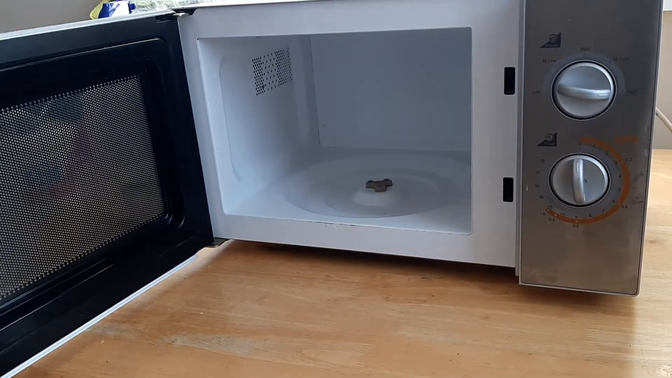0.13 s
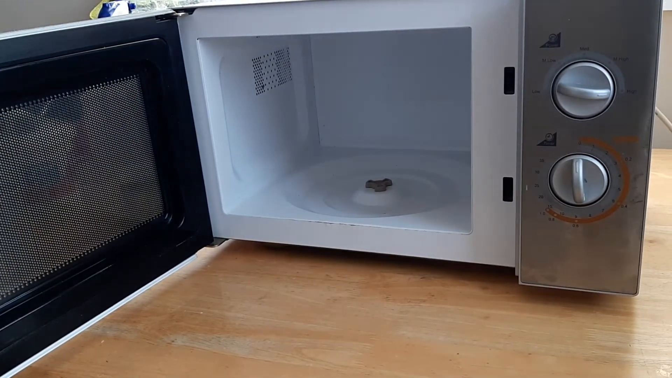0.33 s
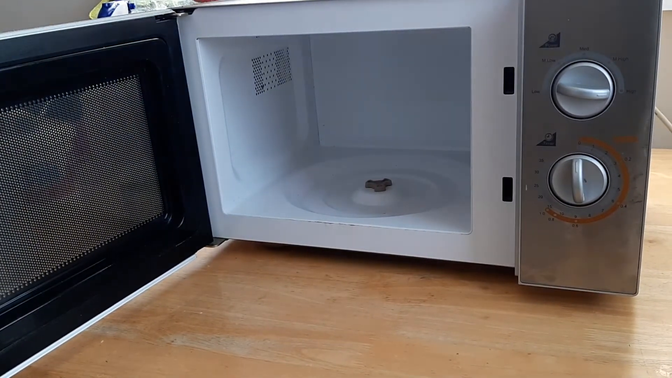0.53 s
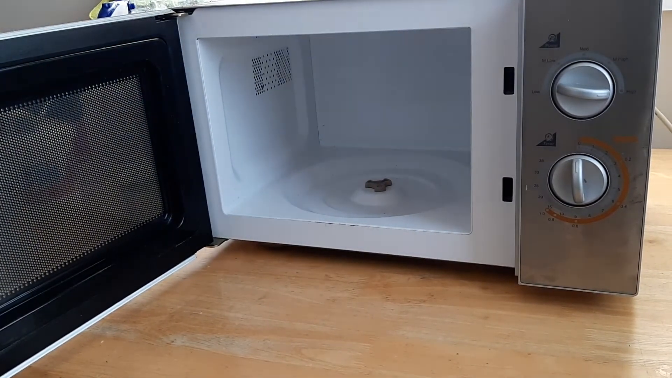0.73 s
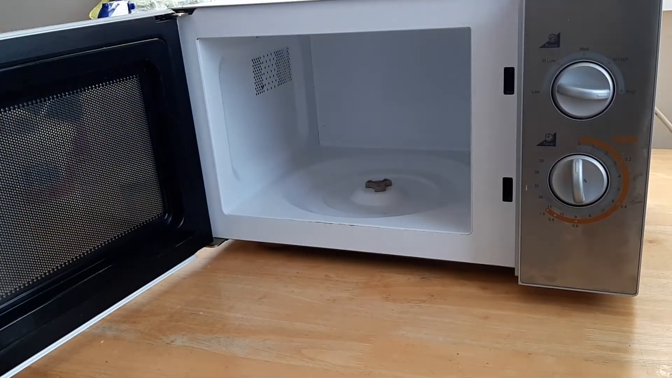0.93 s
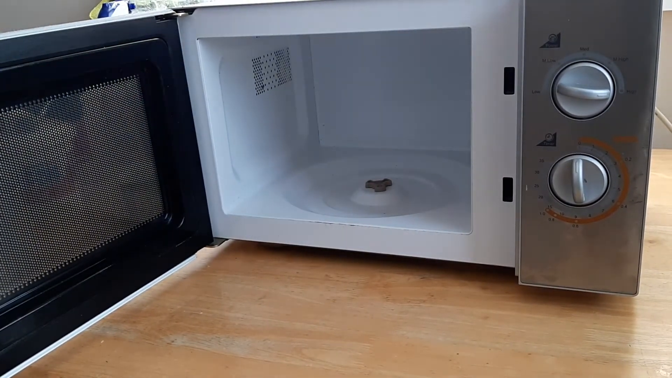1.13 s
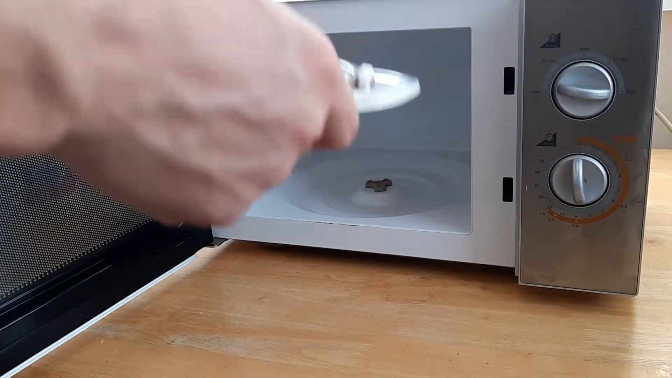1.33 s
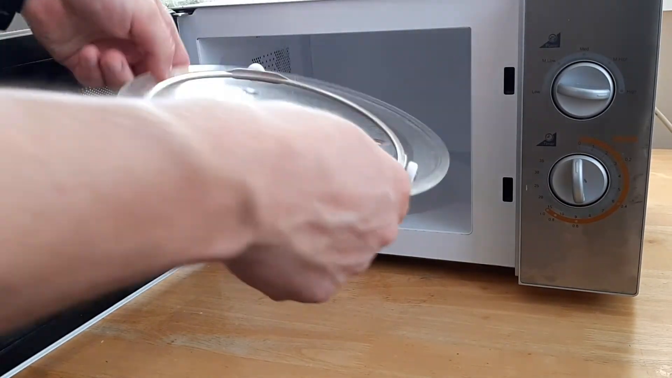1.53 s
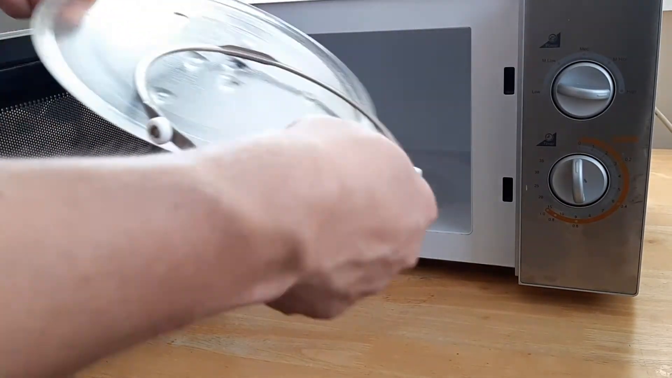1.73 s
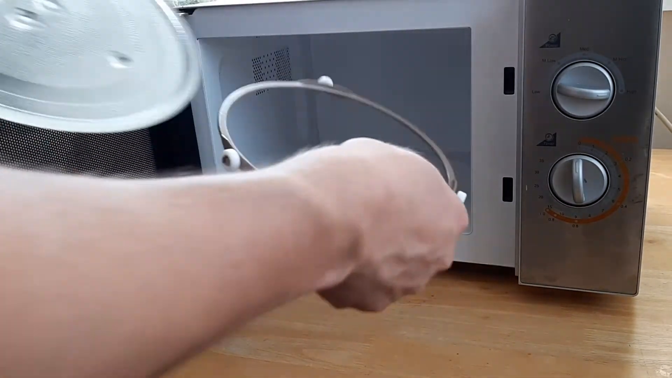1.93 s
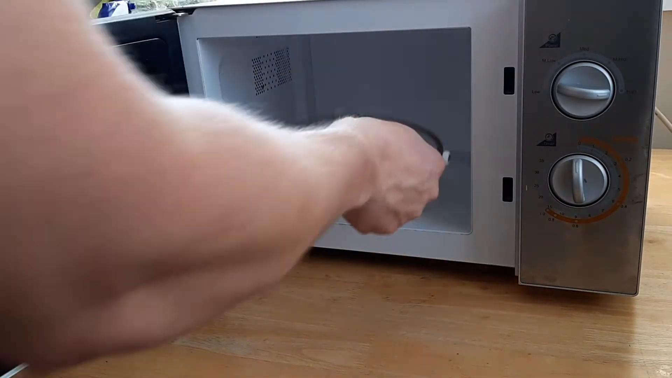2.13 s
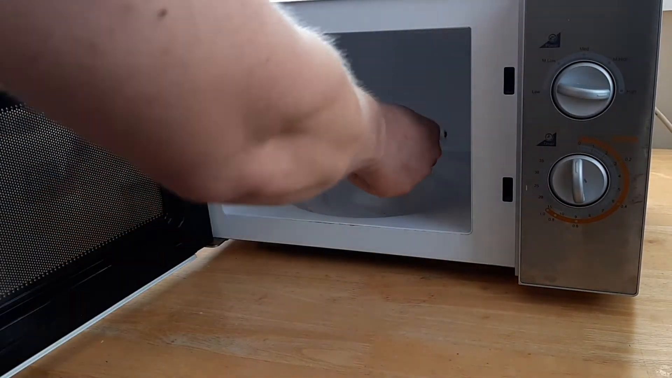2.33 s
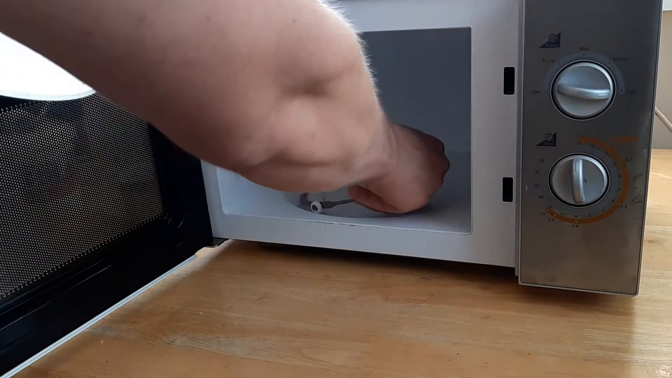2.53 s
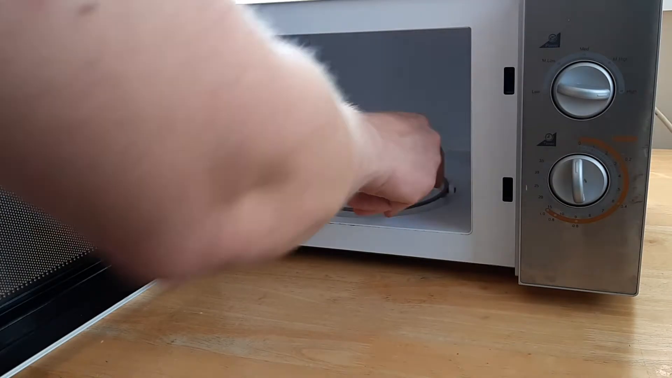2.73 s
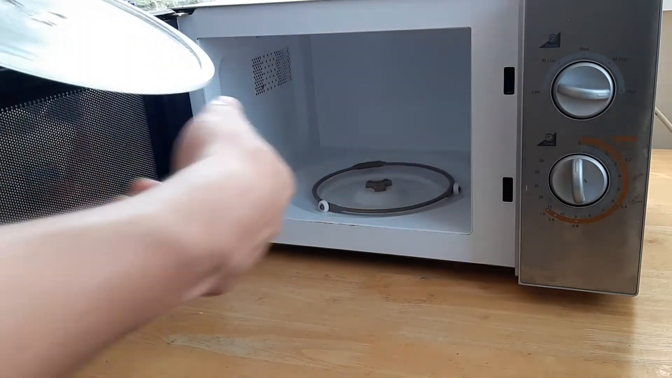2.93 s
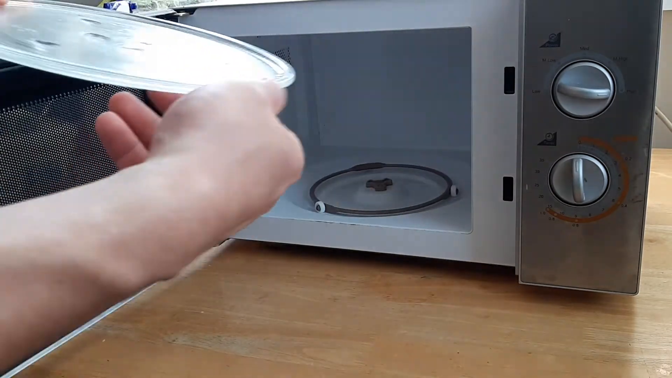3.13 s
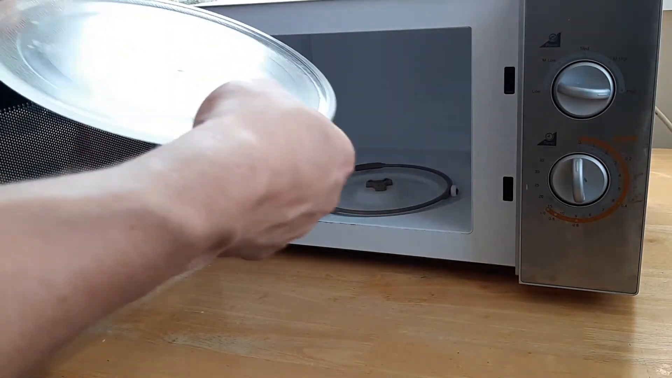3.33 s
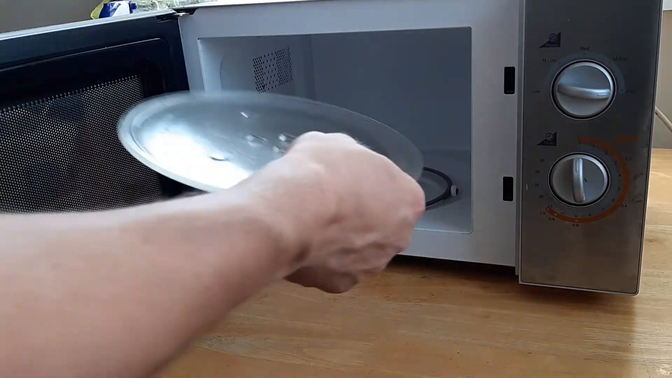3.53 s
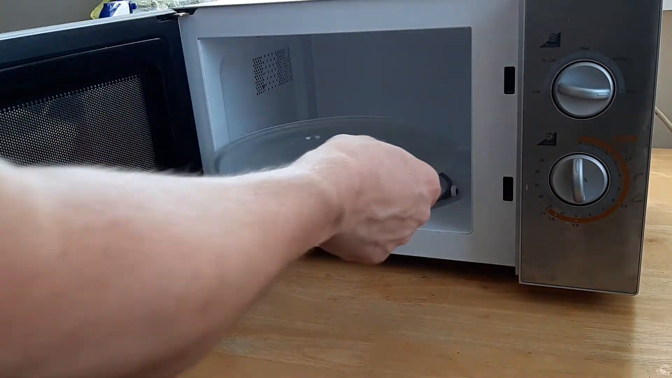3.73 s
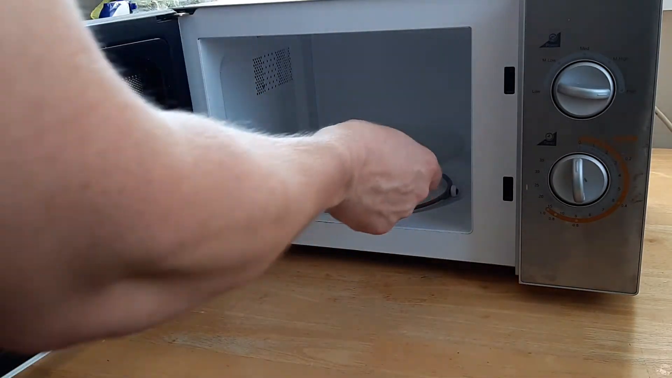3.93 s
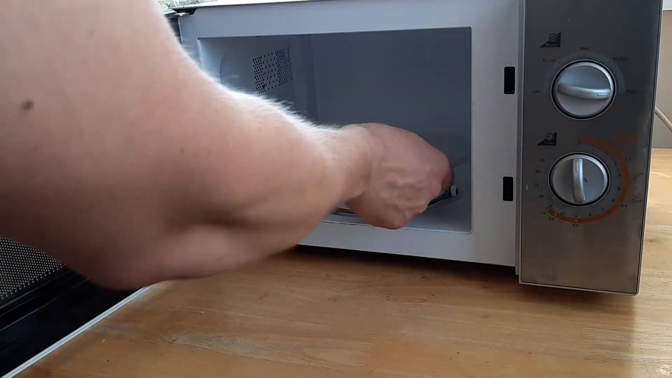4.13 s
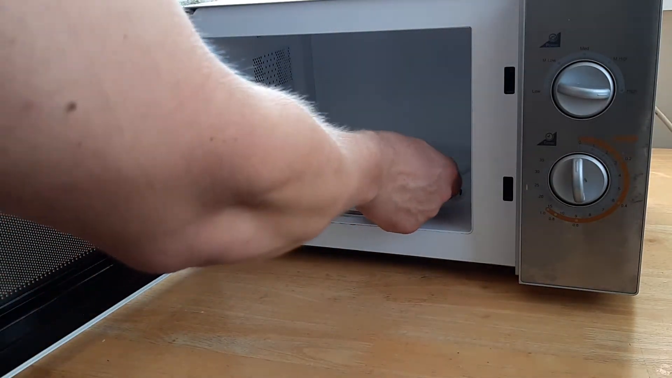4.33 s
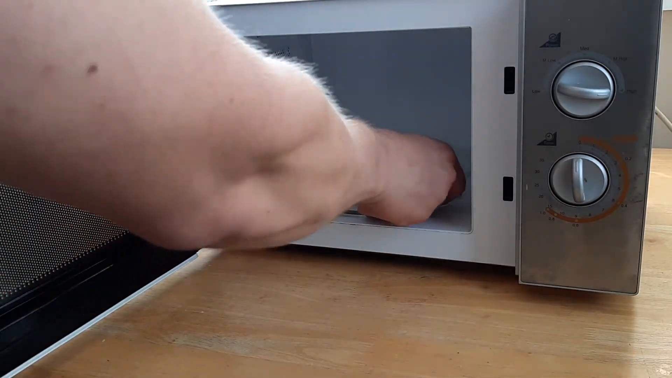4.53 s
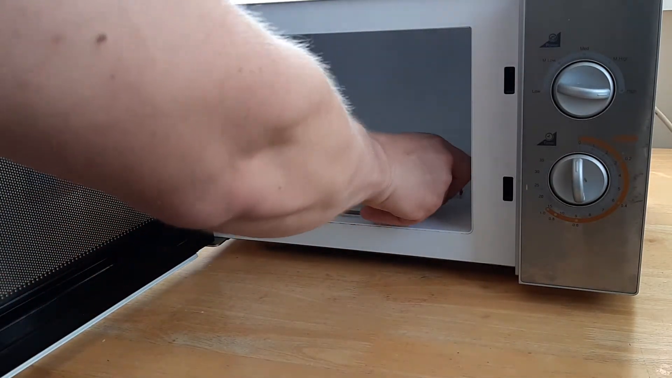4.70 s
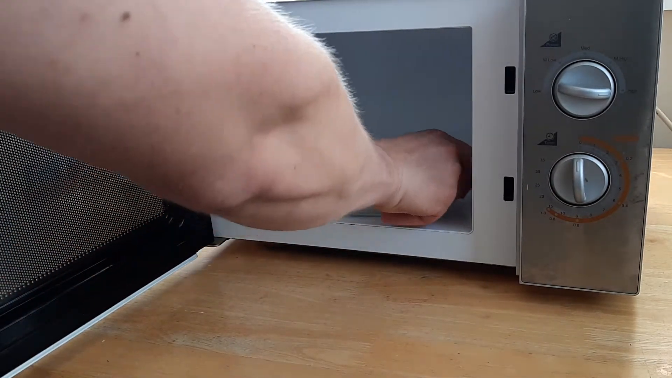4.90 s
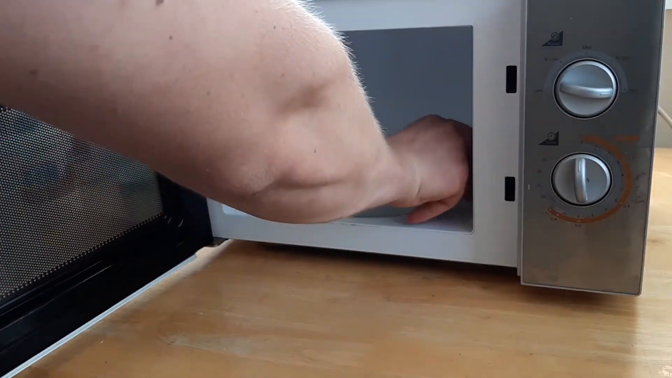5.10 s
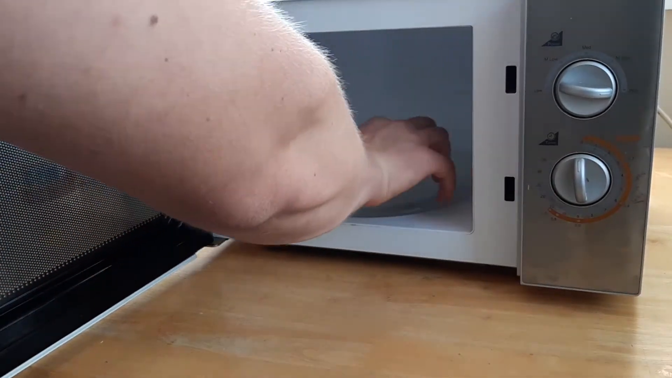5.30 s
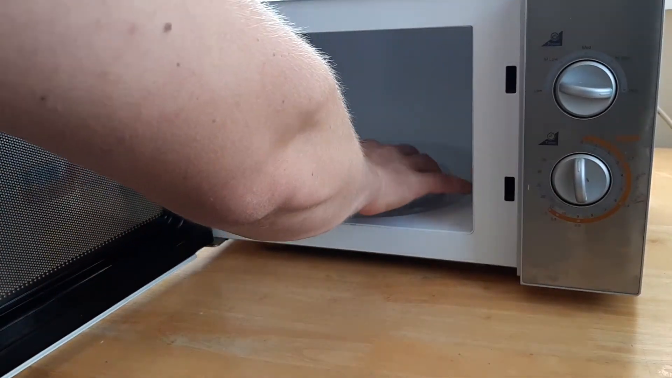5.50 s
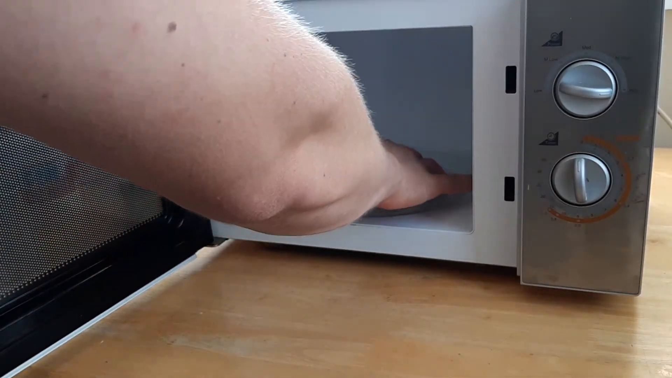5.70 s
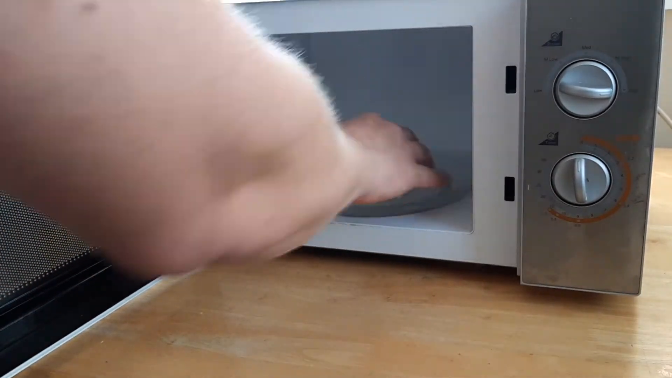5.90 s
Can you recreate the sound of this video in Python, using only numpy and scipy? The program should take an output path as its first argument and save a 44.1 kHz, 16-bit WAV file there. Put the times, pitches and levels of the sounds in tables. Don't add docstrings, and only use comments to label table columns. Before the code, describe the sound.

A glass microwave plate and roller ring clink in the hands, then are set with hard knocks onto the metal oven floor, close up.

```python
import sys
import numpy as np
from scipy import signal
from scipy.fft import rfft, irfft, next_fast_len
from scipy.io import wavfile

SR = 44100
rng = np.random.default_rng(int(sys.argv[2]) if len(sys.argv) > 2 else 0)


def invert_db(level):
    return 10 ** (np.asarray(level, dtype=float) / 20)


def persist_wave(psi):
    counts = np.round(np.clip(psi, -1, 1) * 32767).astype(np.int16)
    wavfile.write(sys.argv[1], SR, np.atleast_2d(counts).T)


N = 267113

# t/s, effort as rumble level/dB
ARM_EFFORT = [(0, -45.5), (.55, -41), (1.05, -48), (1.7, -51), (2.05, -46), (2.4, -46.5), (3.05, -53.5),
              (3.7, -55), (4.0, -49.5), (4.2, -46), (4.5, -43), (5.1, -43), (5.55, -46), (6.06, -49.5)]
# f/Hz, density/dB per Hz
RUMBLE = [(30, -24.5), (60, -15.5), (90, -21.5), (130, -9), (200, -3.5), (300, -0.5), (430, -8), (600, -3),
          (800, -12.5), (1050, -11.5), (1300, -27.5), (2500, -29), (4000, -49.5), (6000, -90.5)]
# f/Hz, density/dB per Hz
RUSTLE = [(700, -5.5), (1200, 1.5), (1600, -10), (2500, -10), (3500, -6), (5000, -16.5), (6200, -10.5),
          (7400, -9.5), (8600, -33.5), (11000, -28), (16000, -31)]
# f/Hz, rms level/dB
HUM = [(200, -70.5), (335, -74.5), (435, -73), (585, -69), (1000, -71)]
# f/Hz, likeness [0..1]
LIKENESS = [(60, 0.99), (250, 0.97), (500, 0.69), (1000, 0.64), (2000, 0.075), (8000, 0.075)]
# f/Hz, t60/s
KITCHEN = [(100, 0.56), (300, 0.49), (1000, 0.47), (3000, 0.44), (6000, 0.37), (12000, 0.3)]
# f/Hz, level/dB
MICROPHONE = [(30, -17), (60, -12), (120, -3.5), (5200, 2.5), (6400, -8.5), (7400, -17), (8600, -8.5),
              (14500, -8), (15600, -10), (16200, -31)]
STILL_DB, RUSTLE_AT_REST_DB, RUSTLE_FOLLOWS = -55, -69, 0.99
DEEP_AT_REST_DB, DEEP_FOLLOWS = -3.5, .9

# f/Hz, level/dB, t60/s
OVEN_MODES = [(142.3, -27, .2), (153, -18, 0.11), (214.2, 1, 0.18), (238.5, -9, 0.33), (284, -11.5, 0.15),
              (324.6, -1.5, 0.16), (390, -11.5, 0.067), (450, -3, 0.1), (510, -6.5, 0.035),
              (554.6, -11.5, 0.22), (702, -9, 0.3), (926.5, -3, 0.51)]
# f/Hz, level/dB, t60/s
RING_MODES = [(1210, -9, .05), (1400, -8, .07), (2020, -7, .08), (2234, -6, .09), (3000, -3, .06),
              (3327, -1, .07), (3542, -1, .06), (3994, -10, .04), (4970, -6, .05), (5954, -6, .04)]
PLATE_HZ = [720, 1567, 1642, 2288, 2751, 2897, 3520, 3790, 4090, 4495, 4532, 4960, 5270, 5682, 6500]
# level/dB, t60/s
PLATE_RINGING = [(-10, 0.055), (1, 0.13), (-12, 0.15), (-13, 0.27), (2, 0.089), (1, 0.19), (-5, 0.14),
                 (-15, 0.31), (-0.5, 0.074), (-7.5, .2), (-4, 0.25), (-5.5, 0.22), (-26, .15), (-6, 0.082),
                 (3, 0.17)]
# f/Hz, level/dB, t60/s
PLATE_TOP = [(9050, 6.5, 0.46), (8500, -17.5, 0.7), (8800, -19, 0.25), (9600, -0.5, 0.26),
             (10950, 8.5, 0.41), (11930, 4, 0.38), (12220, -29.5, 0.46), (12900, -12, 0.57),
             (12990, -21.5, 0.22), (13900, -28, 0.28), (14170, -27, 0.55), (14930, 0, 0.19),
             (15500, -10, 0.14), (15000, -1.5, 0.1)]
# t/s, f/Hz, level/dB, t60/s
SINGING = [(.565, 398.4, -17, 0.23), (.565, 5230, -27, .1), (.74, 1567, -22, 0.43),
           (5.62, 445, -12.5, 0.27), (3.075, 1567, -50, 0.27), (1.733, 736, -26.5, 0.1),
           (1.797, 1567, -23.5, 0.42), (1.797, 2897, -28.5, 0.48), (2.407, 3370, -10.5, 0.14),
           (2.41, 3558, -9, 0.11), (2.41, 992, -18.5, 0.19), (2.411, 1400, -17.5, 0.22),
           (2.507, 557.7, -19.5, 0.21), (2.71, 3030, -11, 0.13), (2.71, 2234, -34, 0.2),
           (2.768, 2024, -28.5, 0.28), (4.255, 277, -16.5, 0.48), (4.255, 1196, -23.5, .2),
           (4.252, 5430, -36, .2), (4.252, 3055, -26, 0.17), (5.127, 2300, -29, 0.83),
           (5.127, 5440, -40, .25), (5.127, 1782, -22, .25), (5.127, 4100, -13, 0.087),
           (5.13, 990, -16.5, 0.3), (5.14, 210, -7, 0.33), (5.62, 317, -17, 0.23), (5.62, 532, -15, .3)]
# t/s, f/Hz, level/dB, stopped at t/s
STOPPED = [
    (1.733, 4531, -18, 1.796),
    (5.127, 4988, -21, 5.24),
    (2.507, 3330, -12, 2.533),
    (.725, 4092, -11.5, 0.734),
]
FREE_T60_S, STOPPED_T60_S = 0.58, .12

# low f/Hz, high f/Hz
KNOCK_EDGES_HZ = [(2200, 7500), (125, 800), (600, 2800), (7000, 17000)]
# t/s, strength/dB, weight (boom over tick)/dB, contact length/s
HAND_KNOCKS = [
    (.563, -9, 2.5, 0.004),
    (.6665, -4, -7.5, 0.0054),
    (.683, -19.5, -8, 0.0039),
    (.70, -16, -6.5, 0.011),
    (.73, -15.5, -23.5, 0.025),
    (.82, -22, -27.5, 0.02),
]
# t/s, strength/dB, weight/dB, contact length/s
RING_TAPS = [
    (1.5625, -17, -11, 0.0031),
    (1.733, -26.5, -26, .004),
    (1.796, -16.5, -40, 0.0026),
    (1.826, -28.5, -26, 0.018),
]
# t/s, strength/dB, weight/dB, contact length/s
RING_KNOCKS = [
    (2.406, -4.5, -13, 0.008),
    (2.42, -6, -19.5, 0.0033),
    (2.44, -24.5, 5, 0.0047),
    (2.507, -7, -13.5, 0.0053),
    (2.525, -32.5, -19.5, .0024),
    (2.585, -26, -3, 0.024),
    (2.709, -2.5, -6.5, 0.005),
    (2.768, -12.5, -24.5, 0.004),
    (2.79, -42.5, 16.5, 0.026),
]
# t/s, strength/dB, weight/dB, contact length/s
PLATE_KNOCKS = [
    (4.250, -8, 3.7, 0.003),
    (4.28, -40, 8, .0063),
    (4.335, -42, 8, 0.03),
    (4.585, -47, 10.5, 0.017),
    (4.675, -52, 24.8, 0.0056),
    (4.763, -38, 12, 0.0038),
    (4.840, -41.5, 12.5, 0.0084),
]
# t/s, strength/dB, weight/dB, contact length/s
SEATING_KNOCKS = [
    (5.1255, -6, 1.5, 0.0068),
    (5.140, -26, 20, 0.0023),
    (5.156, -38.5, 28, 0.0023),
    (5.208, -34, 26.5, 0.005),
    (5.245, -44.5, 16, 0.015),
    (5.357, -57.5, 31, 0.0076),
]
# t/s, strength/dB, weight/dB, contact length/s
PRESSING_KNOCKS = [
    (5.594, -25.5, 11, .014),
    (5.607, -11, 10, .005),
    (5.619, -4, -1.5, 0.0094),
    (5.640, -13.5, -1.5, 0.017),
    (5.657, -37, 27.5, .024),
    (5.678, -13.5, -15.5, 0.012),
    (5.705, -52, 12, .015),
]
CLACK_FOLLOWS_WEIGHT, AIR_FOLLOWS_STRENGTH = 0.7, 0.97
# t/s, strength/dB, dullness/dB per octave, f/Hz of the mode favoured by the spot, its level/dB
CLINKS = [(.517, -40, 7, 2800, -49.5), (0.6664, -6.5, 10, 3510, -16.5), (0.681, -29.5, -2, 2740, -16.5),
          (0.693, -34, -1, 4520, -16), (.705, -15, 14, 5680, -2), (.725, -28, -6.5, 2850, -16),
          (0.769, -46, 4, 4730, -22.5), (.820, -24, 3, 5680, -19.5), (1.382, -38, 9.5, 4000, -36),
          (1.563, -34.5, 3, 4050, -18.5), (1.732, -19, 9.5, 4520, -27.5), (1.796, -24, 5.5, 5680, -12.5),
          (1.826, -21.5, 7.5, 4070, -21), (3.091, -52, 9, 4090, -52)]
LOWEST_RING_HZ, TOP_RING_HZ = 1570, 5680
SPOT_DB_PER_OCTAVE = 86.5


def at_hz(points, hz):
    table_hz, values = np.array(points).T
    return np.interp(np.log(hz), np.log(table_hz), values)


def band(x, low_hz, high_hz):
    return signal.sosfilt(signal.butter(2, [low_hz, high_hz], "band", fs=SR, output="sos"), x)


def drift(rate_hz):
    knots = rng.standard_normal(400)
    position = np.arange(N) / SR * np.clip(rate_hz, .1, 60)
    return np.interp(position, np.arange(400), knots) * 1.2


def ring(force, hz, t60):
    radius = invert_db(-60 / (t60 * SR))
    angle = 2 * np.pi * hz / SR
    return signal.lfilter([0, np.sin(angle)], [1, -2 * radius * np.cos(angle), radius ** 2], force + 1e-18)


def stereo_bands(length, gain):
    out = 0
    edges = 30 * 2 ** np.arange(0, 9.3, .4)
    white = rng.standard_normal((2, 2, length))
    for k, (low, high) in enumerate(zip(edges, edges[1:])):
        mid, side = band(white[k % 2], low, high)
        hz = np.sqrt(low * high)
        alike = np.clip(at_hz(LIKENESS, hz), 0, 1)
        pair = np.sqrt(1 + alike) * mid + np.sqrt(1 - alike) * side * [[1], [-1]]
        out = out + gain(hz) * pair
    return out


def background():
    t = np.arange(N) / SR
    rumble_db = np.interp(t, *np.transpose(ARM_EFFORT))
    effort_db = rumble_db - STILL_DB
    rustle_db = RUSTLE_AT_REST_DB + RUSTLE_FOLLOWS * effort_db
    deep_db = DEEP_AT_REST_DB + DEEP_FOLLOWS * effort_db
    together = drift(3.1)

    def air_gain(hz):
        flicker_db = 0.94 * together + 1.2 * drift(10.0)
        rumble = invert_db(rumble_db + (hz < 160) * deep_db + at_hz(RUMBLE, hz) + 16.0)
        rustle = invert_db(rustle_db + at_hz(RUSTLE, hz) + 19.5)
        return invert_db(flicker_db) * (rumble + rustle)

    air = stereo_bands(N, air_gain)
    hum = 0
    for hz, db in HUM:
        level = invert_db(db + 5.4 * drift(6.0)) * np.sqrt(2)
        hum = hum + level * np.sin(2 * np.pi * hz * t + 1.1 * drift(15.0))
    return air + hum


def kitchen(x, build_s):
    t = np.arange(SR * 3 // 4) / SR
    tail = stereo_bands(len(t), lambda hz: invert_db(-60 * t / at_hz(KITCHEN, hz)))
    tail = tail * (1 - np.exp(-t / build_s))
    tail = tail / np.sqrt(np.sum(tail ** 2) / 2)
    size = next_fast_len(N + len(t))
    return irfft(rfft(x, size) * rfft(tail, size), size)[:, :N]


def contacts(table, clack_db, air_db):
    rows = []
    for s, tick_db, weight, length in table:
        clack = tick_db + CLACK_FOLLOWS_WEIGHT * weight + clack_db
        air = AIR_FOLLOWS_STRENGTH * tick_db + air_db
        rows.append((s, tick_db, tick_db + weight, clack, air, length))
    return rows


def knocks(table, crack_db, body_db, boom_db):
    span = 4096
    force = np.zeros((4, N + span))
    grit = rng.standard_normal((len(table), 4, span))
    for (s, *levels_db, length), noise in zip(table, grit):
        at = int(s * SR)
        fade = np.exp(-np.arange(span) / SR / np.clip(length, .0005, .03))
        force[:, at:at + span] += invert_db(levels_db)[:, None] * noise * fade
    parts = []
    for f, (low, high) in zip(force, KNOCK_EDGES_HZ):
        steep = band(band(f[:N] + 1e-18, low, high), low, high)
        parts.append(steep * np.sqrt(SR / 2 / (high - low)))
    tick, boom, clack, air = parts
    body = sum(invert_db(db) * ring(tick + clack, hz, t60) for hz, db, t60 in RING_MODES)
    oven = sum(invert_db(db) * ring(boom, hz, min(t60, .22)) for hz, db, t60 in OVEN_MODES)
    return invert_db(crack_db) * (tick + clack + boom + air) + invert_db(body_db) * body + invert_db(boom_db) * oven


def singing():
    t = np.arange(N) / SR
    out = np.zeros(N)
    for s, hz, db, t60 in SINGING:
        level = invert_db(db - 60 * np.maximum(t - s, 0) / t60) * (t > s)
        out += level * np.sin(2 * np.pi * hz * (t - s))
    return out


def stopped():
    t = np.arange(N) / SR
    out = np.zeros(N)
    for s, hz, db, stop in STOPPED:
        free_loss = np.maximum(t - s, 0) / FREE_T60_S
        touch_loss = np.maximum(t - stop, 0) / STOPPED_T60_S
        level = invert_db(db - 60 * (free_loss + touch_loss)) * (t > s)
        out += level * np.sin(2 * np.pi * hz * (t - s))
    return out


def struck_db(rows, hz):
    _, db, dull, spot_hz, spot_db = rows.T
    spot = invert_db(spot_db - SPOT_DB_PER_OCTAVE * np.abs(np.log2(hz / spot_hz)))
    octaves_up = np.log2(np.clip(hz, LOWEST_RING_HZ, TOP_RING_HZ) / LOWEST_RING_HZ)
    return 20 * np.log10(invert_db(db - dull * octaves_up) + spot)


def clinks():
    rows, out = np.array(CLINKS), np.zeros(N)
    at = (rows[:, 0] * SR).astype(int)
    modes = [(hz, db, t60) for hz, (db, t60) in zip(PLATE_HZ, PLATE_RINGING)]
    modes += [(hz, db - 7.0, min(t60, .13)) for hz, db, t60 in PLATE_TOP]
    signs = rng.choice([-1, 1], (len(rows), len(modes)))
    for k, (hz, level_db, t60) in enumerate(modes):
        force = np.zeros(N)
        force[at] = signs[:, k] * invert_db(level_db + struck_db(rows, hz))
        out += ring(force, hz, t60)
    return out


def scene():
    glass = clinks() + singing()
    free = stopped()
    ring_blows = (contacts(HAND_KNOCKS, clack_db=-1.5, air_db=-2)
                  + contacts(RING_TAPS, clack_db=-12, air_db=-2.5)
                  + contacts(RING_KNOCKS, clack_db=-1.5, air_db=-4))
    plate_blows = (contacts(PLATE_KNOCKS, clack_db=-4.5, air_db=-17.5)
                   + contacts(SEATING_KNOCKS, clack_db=3.5, air_db=-17.5)
                   + contacts(PRESSING_KNOCKS, clack_db=-13, air_db=-15))
    blows = knocks(ring_blows, crack_db=-7.0, body_db=-44.5, boom_db=-58.5)
    blows = blows + knocks(plate_blows, crack_db=-7.0, body_db=-64.0, boom_db=-54.5)
    direct = invert_db(-4) * (glass + free) + blows
    reflections = kitchen(invert_db(-9) * glass + invert_db(-17.5) * free + invert_db(4.0) * blows, build_s=0.00081)
    lag, far_lag, left_db = 1, 12, .9
    late = np.r_[np.zeros(lag), direct[:-lag]]
    left, right = background()
    return np.array([invert_db(left_db) * direct + left, late + np.roll(right, far_lag)]) + reflections


def low_pass(x):
    return signal.sosfilt(signal.butter(12, 16790, fs=SR, output="sos"), x)


def record(dry):
    size = next_fast_len(N + SR // 4)
    hz = np.maximum(np.arange(size // 2 + 1) * SR / size, 1)
    x = irfft(rfft(dry, size) * invert_db(at_hz(MICROPHONE, hz)), size)[:, :N]
    x = x / (1 + (x / 1.05) ** 4) ** .25
    mix = signal.sosfilt(signal.cheby2(12, 60, 16800, fs=SR, output="sos"), x)
    return low_pass(mix)


dry = scene()
out = record(dry)
persist_wave(out)
```